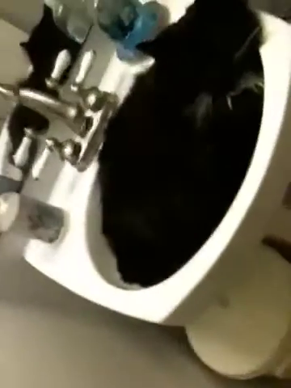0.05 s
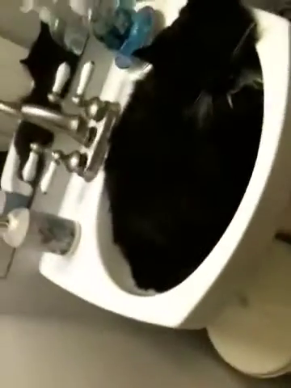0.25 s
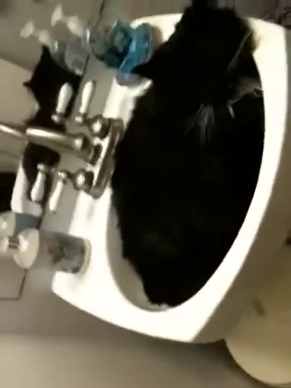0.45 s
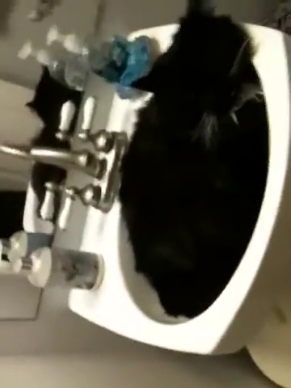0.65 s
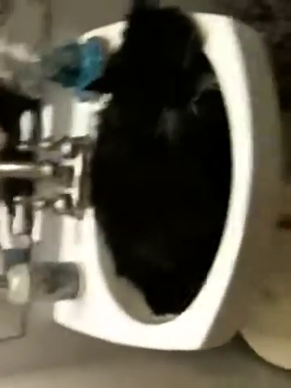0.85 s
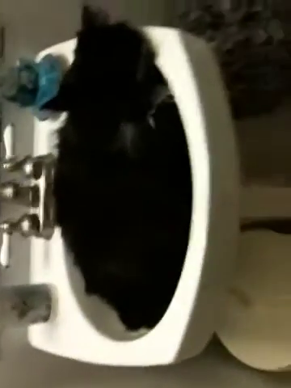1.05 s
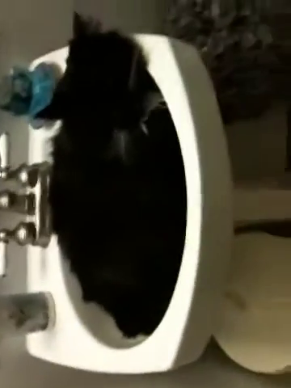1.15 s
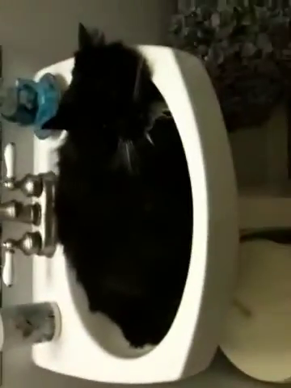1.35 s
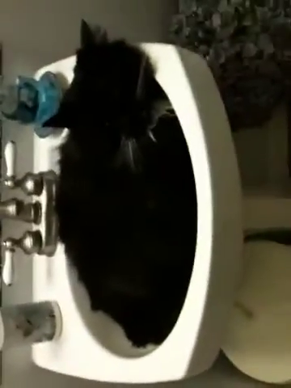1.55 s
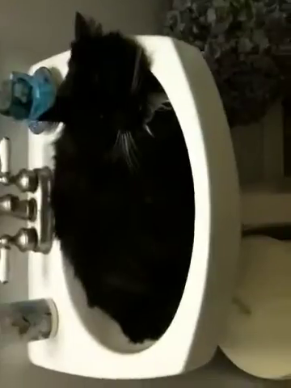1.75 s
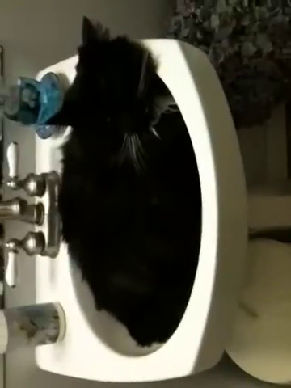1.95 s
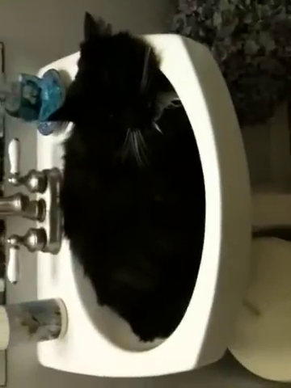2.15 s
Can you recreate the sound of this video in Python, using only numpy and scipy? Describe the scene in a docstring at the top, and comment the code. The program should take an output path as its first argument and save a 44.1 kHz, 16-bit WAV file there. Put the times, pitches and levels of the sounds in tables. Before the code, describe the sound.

Camera handling noise, heard right at the microphone in a quiet bathroom. At 0.2 seconds a finger slides and knocks the case, which rings briefly, then the palm rubs dully. From 0.7 seconds a crackly slide runs into a click and low bump near 0.9 seconds. Afterwards come only soft rumble, scuffs and thuds, with tiny high ticks from 1.2 to 1.9 seconds, over faint steady hiss.

```python
"""A small camera held in a quiet bathroom, heard on its own microphone, right at the hand.
At 0.2 s a finger slides and knocks, and the case rings briefly. The palm rubs dully over it.
From 0.7 s a second, crackly slide runs into a click and a low bump as the fingertip lands.
After that the steadying hand only rumbles, scuffs and thuds softly, with a run of tiny high ticks,
over the faint even hiss of room and microphone."""
import sys
import numpy as np
from scipy import signal
from scipy.fft import rfft, irfft
from scipy.io import wavfile

SR = 44100
rng = np.random.default_rng(int(sys.argv[2]) if len(sys.argv) > 2 else 0)


def generate_wav(sig):
    """Save sig (samples, or channels by samples) to the path in sys.argv[1] as 16-bit PCM at SR."""
    pcm = np.round(np.clip(np.atleast_2d(sig).T, -1, 1) * 32767).astype(np.int16)
    wavfile.write(sys.argv[1], SR, pcm)


N = 97020

# A touch, the chatter of the knock, later light taps: start_s, level_db (ahead of the EQ), lowpass_hz
KNOCKS = [(.192, -38.5, 7000), (.199, -44, 7000), (0.2309, -27, 400), (0.2346, -20, 1000),
          (0.2366, -16.5, 2560), (0.238, -30, 900), (0.239, -25.5, 1700), (.2427, -22, 2600),
          (0.2435, -30, 900), (.268, -44, 2500), (.3565, -45, 700), (1.123, -57.5, 497),
          (1.214, -58.5, 403), (1.499, -57, 700)]
# Resonances of the case: pitch_hz, gain_db, t60_s
CASE_MODES = [(194, -18, 0.039), (260, -37, 0.033), (412, -21.5, 0.028), (780, -23, 0.055),
              (1180, -22, 0.01), (1530, -30.5, 0.038), (1990, -35, 0.06), (2396, -26.5, .036),
              (2540, -31, 0.043), (2800, -28, .03), (3390, -26.5, 0.018)]
# Soft thuds of the grip: start_s, level_db, pitch_hz
GRIP_THUDS = [(.356, -53, 246.4), (0.418, -44, 184), (0.451, -40.5, 204), (.489, -36, 194),
              (.513, -31, 251), (.533, -48, 262), (0.563, -39.5, 187), (0.607, -37.5, 176),
              (.640, -38.5, 214), (.673, -47, 198), (.738, -39, 185), (.962, -39, 194), (.975, -52.5, 160),
              (1.098, -47, 192), (1.124, -50.5, 186), (1.174, -48, 151), (1.314, -47.5, 144),
              (1.49, -53, 179), (1.537, -54, 147), (1.619, -53.5, 158), (1.75, -58.5, 190),
              (1.795, -60, 169), (1.905, -54, 230), (2.077, -55.5, 180), (2.132, -52, 146)]
# What each slip of the fingertip rings: pitch_hz, gain_db, t60_s
CRACKLE_MODES = [(4700, -5, 0.0087), (5330, 5, 0.0046), (6500, -5, 0.003), (9300, -12, 0.0013)]
# Faint scuffs of the palm: centre_s, level_db
PALM_SCUFFS = [(.98, -66), (1.123, -64), (1.214, -69), (1.501, -62), (1.802, -73)]

# How each movement of the hand swells and fades: time_s, level_db
FIRM_SLIDE_LEVEL = [(.186, -76), (.193, -52), (.203, -50), (.214, -46), (.229, -41.5), (.24, -53),
                    (.247, -50), (.256, -113)]
DRAG_LEVEL = [(.235, -84), (.25, -54.5), (.272, -56.5), (.318, -56), (.345, -64), (.40, -66.5), (.46, -80)]
LIGHT_SLIDE_LEVEL = [(0, -77.5), (.062, -68), (.105, -70), (.15, -75), (.185, -71), (.26, -85), (.57, -79),
                     (.62, -73.5), (.69, -85), (.725, -69), (.74, -71), (.765, -70), (.803, -58),
                     (.824, -72), (.853, -48.5), (.866, -55), (.872, -100)]
PALM_LEVEL = [(.33, -82), (.36, -56), (.41, -67.5), (.46, -51), (.495, -46.5), (.515, -37.5), (.558, -41),
              (.58, -59.5), (.63, -67.5), (.675, -58), (.71, -71.5), (.765, -62), (.80, -50.5), (.845, -40),
              (.86, -55), (.89, -61), (.93, -68.5)]
CRACKLE_LEVEL = [(.70, -85), (.725, -69), (.738, -75), (.752, -65), (.80, -61), (.825, -66), (.85, -57),
                 (.864, -61), (.87, -100)]
LAST_BRUSH_LEVEL = [(.955, -92), (.983, -75), (1.005, -86)]
TREMOR_LEVEL = [(.2, -81), (.3, -60.5), (.45, -58.5), (.7, -58), (.9, -55.5), (1.12, -59.5), (1.3, -62.5),
                (1.8, -62), (2.0, -66.5), (2.25, -74)]

# Tone of each source as it reaches the microphone: frequency_hz, gain_db
KNOCK_EQ = [(30, 1), (90, -16.5), (170, 0.5), (650, -2), (930, -7), (1150, 3.5), (1750, -3.5), (3500, -1),
            (6000, 1.5), (12000, -15)]
CLICK_EQ = [(100, -29), (1000, -5), (2500, -10), (3150, -1), (4500, 3.5), (6100, -2), (9000, -19),
            (13000, -12), (16000, -24)]
FIRM_SLIDE_EQ = [(50, -47), (190, 12), (500, 5.5), (1100, -1), (2400, -6), (4000, -4.5), (6500, -2),
                 (10000, -6), (15500, -13.5)]
DRAG_EQ = [(50, -28), (170, 7.5), (450, -1.5), (900, -8.5), (2500, -15), (4500, -18.5), (6500, -27.5),
           (15000, -48)]
LIGHT_SLIDE_EQ = [(100, -4.5), (1500, -7.5), (3300, -13), (4800, -1.5), (6800, -5.5), (9500, -2.5),
                  (12000, -8.5), (15500, -18)]
PALM_EQ = [(40, -42), (110, -6), (220, 4.5), (350, -0.5), (530, -2), (780, -13.5), (1050, -22), (2200, -34),
           (4000, -47), (9000, -73)]
TREMOR_EQ = [(25, -22), (50, -11.5), (85, -2.5), (130, 3), (190, -0.5), (270, -6), (370, -25), (600, -33.5),
             (1200, -46.5), (4000, -60)]
HISS_EQ = [(20, -18), (80, -3), (190, 20), (500, 6), (1000, 4), (2000, 1.5), (5000, 0), (10000, -.5),
           (15500, -2)]


def case_knocks(contact_s=0.00037, low_cut_hz=160):
    """A finger hits the case that holds the microphone: a push and a ring, duller for a soft touch."""
    out, t = np.zeros(N), np.arange(SR // 8) / SR
    push = np.exp(-t / contact_s)
    for start_s, level_db, lowpass_hz in KNOCKS:
        ring = sum(amp(db - 60 * t / t60) * np.sin(2 * np.pi * hz * t * rng.uniform(0.92, 1.02))
                   for hz, db, t60 in CASE_MODES)
        blow = signal.lfilter(*signal.butter(1, lowpass_hz, fs=SR), push + ring)
        blow = low_cut(blow, low_cut_hz)
        add(out, start_s, amp(level_db) * blow / abs(blow).max())
    return colour(out, KNOCK_EQ)


def fingertip_bump(start_s=.8677, level_db=-18, rise_s=0.00071, t60_s=0.028):
    """The fingertip lands by the microphone: a damped push whose pitch sinks as the flesh settles."""
    out, t = np.zeros(N), np.arange(SR // 10) / SR
    first_hz, settled_hz, settle_s = 278, 113.6, .003
    pitch_hz = settled_hz + (first_hz - settled_hz) * np.exp(-t / settle_s)
    envelope = amp(level_db - 60 * t / t60_s) * (1 - np.exp(-t / rise_s))
    add(out, start_s, -envelope * np.sin(2 * np.pi * np.cumsum(pitch_hz) / SR))
    return out


def fingertip_click(burst_s=.8665, burst_db=-37, rise_s=0.00044, snap_s=.8672, snap_db=-17):
    """The sharp edge of that landing: a dry snap inside a short burst of noise."""
    out, t = np.zeros(N), np.arange(SR // 10) / SR
    envelope = amp(burst_db) * t / rise_s * np.exp(1 - t / rise_s)
    add(out, burst_s, envelope * rng.standard_normal(len(t)))
    add(out, snap_s, amp([snap_db]))
    return colour(out, CLICK_EQ)


def finger_slides():
    """Skin on the case, very close: a firm bright stroke, a drag after the knock, and light strokes."""
    firm = level(FIRM_SLIDE_LEVEL) * friction(FIRM_SLIDE_EQ, slips_per_s=6900, spread_db=2.5, smooth=.5)
    drag = level(DRAG_LEVEL) * friction(DRAG_EQ, slips_per_s=2200, spread_db=6.5, smooth=.45)
    light = level(LIGHT_SLIDE_LEVEL) * friction(LIGHT_SLIDE_EQ, slips_per_s=900, spread_db=3, smooth=.97)
    return firm + drag + light


def palm_rub(scuff_width_s=0.0065):
    """Dull rubbing carried through the case to the microphone, then a few brief scuffs."""
    t = np.arange(N) / SR
    scuffs = sum(amp(db) * np.exp(-.5 * ((t - s) / scuff_width_s) ** 2) for s, db in PALM_SCUFFS)
    pressure = level(PALM_LEVEL) + scuffs
    return pressure * friction(PALM_EQ, slips_per_s=2200, spread_db=4.5, smooth=.4)


def grip_thuds(rise_cycles=0.84, sharpness=1.88):
    """The grip creaks in smooth low pulses of two or three cycles."""
    out, t = np.zeros(N), np.arange(SR // 16) / SR
    for start_s, level_db, pitch_hz in GRIP_THUDS:
        age = t * pitch_hz / rise_cycles  # 1 at the top of the swell
        envelope = amp(level_db) * (age * np.exp(1 - age)) ** sharpness
        add(out, start_s, envelope * np.sin(2 * np.pi * pitch_hz * t))
    return out


def skin_crackle(count=600, slips_per_s=220, jitter=.6, spread_db=3.5):
    """Skin sticks and slips in the second slide and a last brush, each slip a brief high ring."""
    slips, t = np.zeros(N), np.arange(SR // 100) / SR
    gap, size = rng.standard_normal((count, 2)).T
    starts_s = np.cumsum(np.exp(jitter * gap)) / slips_per_s
    ring = sum(amp(db - 60 * t / t60) * np.sin(2 * np.pi * hz * t) for hz, db, t60 in CRACKLE_MODES)
    for start_s, gain in zip(starts_s, amp(spread_db * size)):
        add(slips, start_s, gain * ring)
    thin = low_cut(slips, corner_hz=3900, order=4)
    return (level(CRACKLE_LEVEL) + level(LAST_BRUSH_LEVEL)) * unit(thin)


def hand_tremor():
    """The holding hand trembles: lumpy low handling rumble."""
    return level(TREMOR_LEVEL) * friction(TREMOR_EQ, slips_per_s=160, spread_db=4.5, smooth=.68)


def faint_ticks(count=8, start_s=1.1827, period_s=.1024, level_db=-58, pitch_hz=12200, t60_s=.001):
    """Tiny evenly spaced ticks, probably from the camera's electronics."""
    out, t = np.zeros(N), np.arange(SR // 200) / SR
    tick = amp(level_db - 60 * t / t60_s) * np.sin(2 * np.pi * pitch_hz * t)
    for k in range(count):
        add(out, start_s + k * period_s, tick)
    return out


def room_hiss(level_db=-74):
    """Steady room tone and the microphone's own noise."""
    return amp(level_db) * unit(colour(rng.standard_normal(N), HISS_EQ))


def friction(eq, slips_per_s, spread_db, smooth):
    """Tiny uneven slips over hiss of relative gain `smooth`, coloured by the path to the microphone."""
    size = amp(spread_db * np.minimum(rng.exponential(1, N), 3))
    sign = rng.choice([-1., 1.], N)
    slipping = rng.random(N) < slips_per_s / SR
    rub = unit(size * sign * slipping) + smooth * rng.standard_normal(N)
    return unit(colour(rub, eq))


def colour(x, eq):
    """Causal filter that follows (frequency_hz, gain_db) points."""
    hz, db = np.transpose(eq)
    size = 2 * N
    log_hz = np.log(np.fft.rfftfreq(size, 1 / SR) + 1)
    gain = amp(np.interp(log_hz, np.log(hz), db))
    cepstrum = irfft(np.log(gain))
    cepstrum[1:N] *= 2  # folded to minimum phase, so nothing rings ahead of a hit
    cepstrum[N + 1:] = 0
    return irfft(rfft(x, size) * np.exp(rfft(cepstrum)))[:N]


def low_cut(x, corner_hz, order=2):
    """Rolls off the bass below the corner."""
    return signal.lfilter(*signal.butter(order, corner_hz, "high", fs=SR), x)


def level(points):
    """Gain over time from (time_s, level_db) points, silent outside them."""
    s, db = np.transpose(points)
    return amp(np.interp(np.arange(N) / SR, s, db, left=-np.inf, right=-np.inf))


def amp(db):
    """Decibels to amplitude."""
    return 10 ** (np.asarray(db) / 20)


def unit(x):
    """Scales to rms 1."""
    return x / np.sqrt(np.mean(x ** 2) + 1e-20)


def add(mix, start_s, sound):
    """Mixes a sound in at start_s."""
    part = mix[max(round(start_s * SR), 0):][:len(sound)]
    part += sound[:len(part)]


def scene():
    """Close handling noise over the quiet room, in mono."""
    background = room_hiss() + hand_tremor() + faint_ticks()
    rubbing = palm_rub() + finger_slides() + skin_crackle()
    contacts = case_knocks() + grip_thuds() + fingertip_bump() + fingertip_click()
    return (contacts + rubbing + background)[None]


def record(dry):
    """The camera's microphone rolls off the bass, and the very top of the treble is cut."""
    thin = low_cut(dry, corner_hz=53)
    band_limit = signal.firwin(511, cutoff=15750, window=("kaiser", 9), fs=SR)
    return signal.oaconvolve(thin, band_limit[None], "same")


dry = scene()
out = record(dry)
generate_wav(out)
```